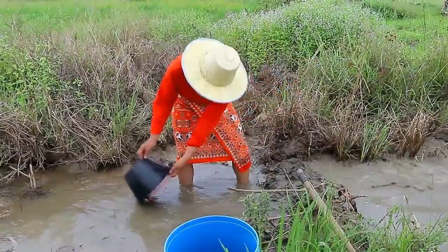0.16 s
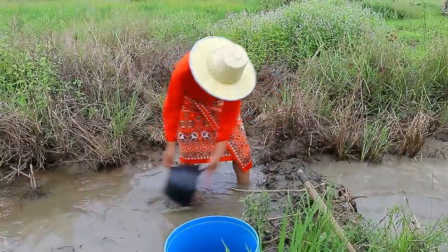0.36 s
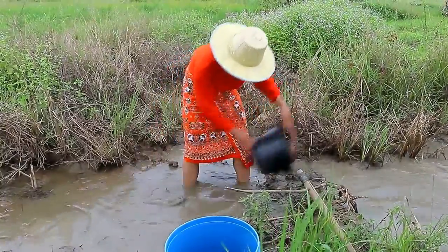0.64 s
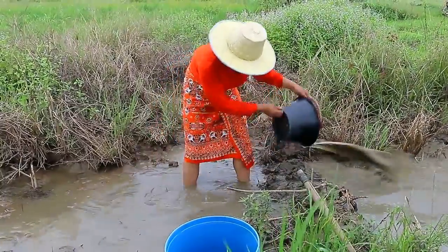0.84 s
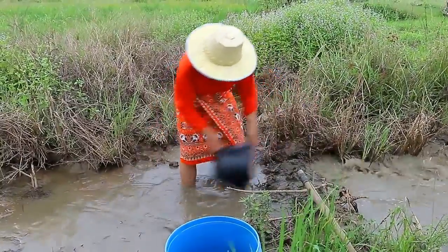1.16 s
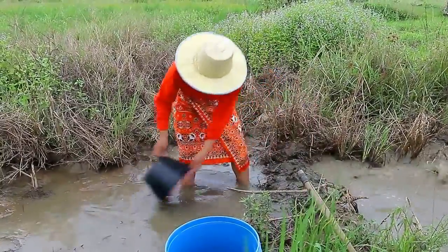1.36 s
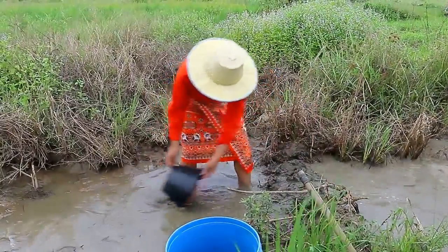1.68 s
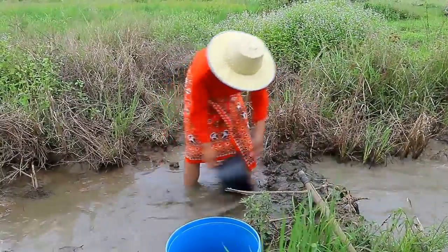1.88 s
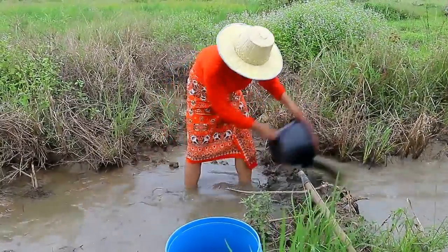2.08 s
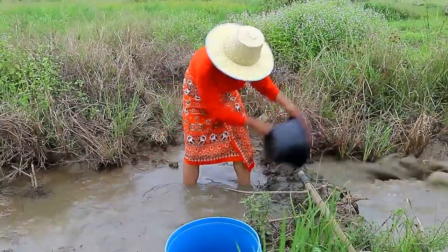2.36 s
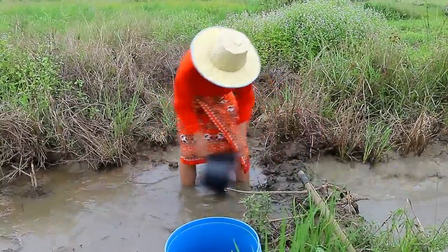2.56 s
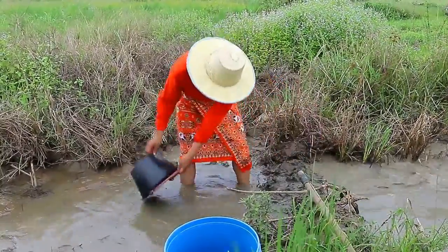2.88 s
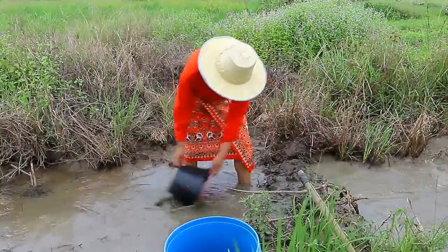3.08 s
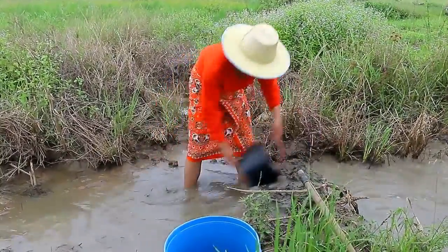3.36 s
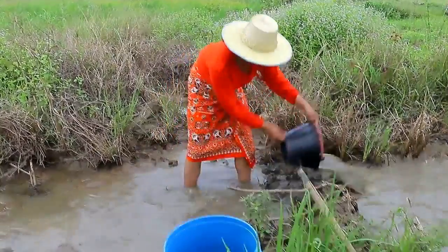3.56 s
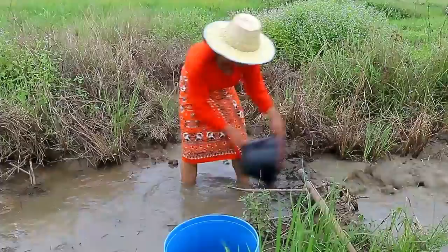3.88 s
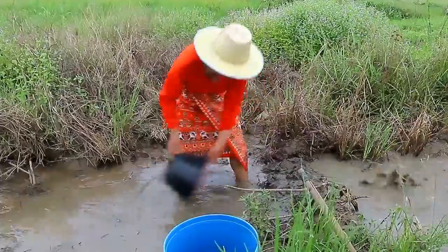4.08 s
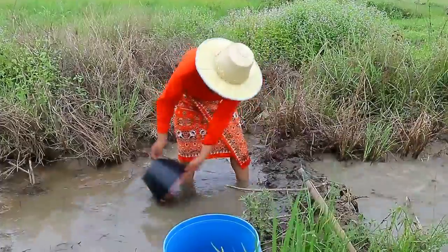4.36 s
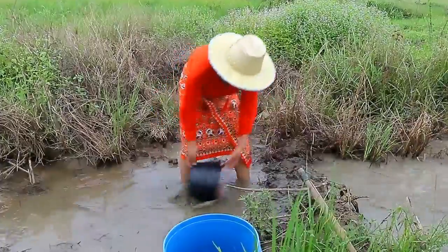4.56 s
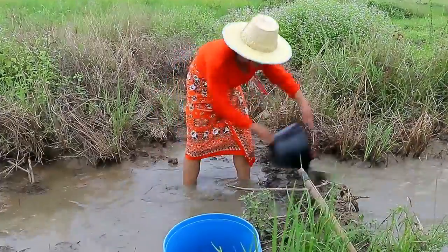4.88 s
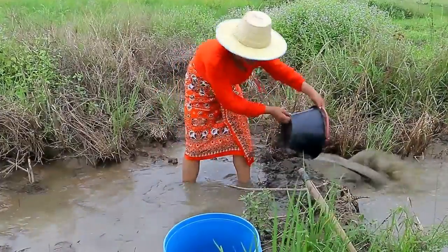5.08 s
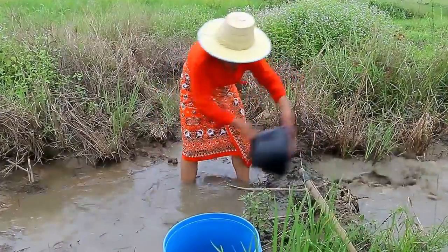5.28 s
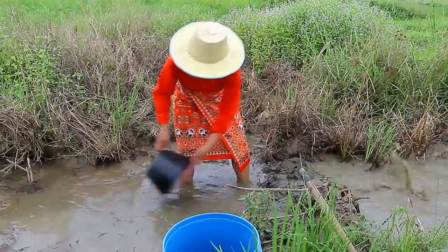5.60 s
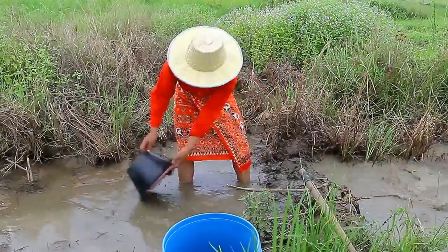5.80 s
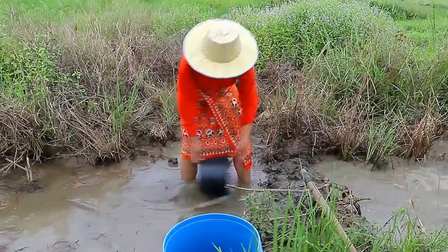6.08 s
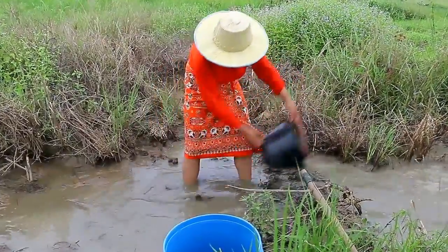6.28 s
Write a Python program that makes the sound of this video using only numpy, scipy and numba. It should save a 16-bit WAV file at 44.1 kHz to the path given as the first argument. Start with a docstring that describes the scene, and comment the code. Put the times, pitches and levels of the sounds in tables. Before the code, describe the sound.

Open field beside a ditch, stereo microphone exposed to wind. Water trickles and drips, then a bucketful slaps down in a wet, spattering splash; this repeats four times at a steady working pace. Deep air-pocket gurgles sit under the splashes, and one dull bucket knock precedes the last. High insect chirps and rapid hissy buzzes stay faint behind, over steady soft rustle. Wind thumps separately left and right, and a new scoop's spill begins as it ends.

```python
"""Bailing a ditch by bucket

A bucket scoops muddy water and throws it over a bank, where it lands in long splashes: swarms of damped,
rising sines in four bubble sizes plus noise wash. Single drops, and one knock of the bucket, are a noise
crack with a damped sine. Wind buffets each port as low noise and short eddies; one insect chirps falling
tones, another buzzes in bursts of narrow modulated hiss, and the field rustles as steady shaped noise."""
import sys
import numpy as np
from scipy.fft import rfft, irfft, next_fast_len
from scipy.io import wavfile
from scipy.ndimage import map_coordinates
from numba import njit

SR = 44100
rng = np.random.default_rng(int(sys.argv[2]) if len(sys.argv) > 2 else 0)


def unload_audio(sound):
    """Save the sound as a 16-bit wav file, at the path given as the first command line argument."""
    columns = np.transpose(np.atleast_2d(sound))
    # keep every value between -1 and 1, then stretch to whole-number steps
    steps = np.round(np.clip(columns, -1, 1) * 32767)
    wavfile.write(sys.argv[1], SR, steps.astype(np.int16))


N = 283860
LAG_S = 50e-6  # mean delay of the left port behind the right


def amp(db):
    """Amplitude factor from dB."""
    return 10 ** (np.asarray(db) / 20)


def unit(x):
    """Scale to rms 1 over all channels."""
    return x / np.sqrt(np.mean(x ** 2) + 1e-20)


def along(points, hz):
    """Interpolate (f/Hz, value) points on a log frequency axis."""
    f, v = np.transpose(points)
    return np.interp(np.log(hz + 1), np.log(f + 1), v)


def curves(rows, outside=None):
    """One value per sample for each column after the time."""
    s, *cols = np.transpose(rows)
    t = np.arange(N) / SR
    return np.array([np.interp(t, s, c, outside, outside) for c in cols])


def wobble(rate_hz):
    """Smooth random curve with rate_hz knots a second."""
    knots = rng.standard_normal(int(N * rate_hz / SR) + 4)
    return map_coordinates(knots, [np.arange(N) * rate_hz / SR])


def filtered(x, response):
    """Apply a complex response of frequency."""
    m = next_fast_len(N + SR // 2)
    hz = np.fft.rfftfreq(m, 1 / SR)
    return irfft(rfft(x, m) * response(hz), m)[..., :N]


def rush(spectrum):
    """Stereo noise of rms 1, partly alike in both ports, reaching the left one LAG_S late."""
    # Left-right likeness of diffuse sound: f/Hz, correlation
    alike = [(300, 1), (1000, 0.68), (3000, 0.65), (8000, 0.063), (15000, 0.21)]

    def mid_side(hz):
        turn = np.arccos(np.clip(along(alike, hz), -1, 1)) / 2
        return amp(along(spectrum, hz)) * [np.cos(turn), np.sin(turn)]

    def delay(hz):
        return np.exp(-1j * np.pi * hz * LAG_S * np.array([[1], [-1]]))

    mid, side = filtered(rng.standard_normal((2, N)), mid_side)
    return unit(filtered(np.array([mid + side, mid - side]), delay))


@njit
def add(out, start, hz, cycles, size, rise, soft, sr):
    """Add damped sines whose pitch climbs as the bubble nears the surface."""
    for g in range(len(start)):
        first = int(start[g] * sr) + 1
        life = cycles[g] / hz[g]
        for i in range(max(first, 0), min(first + int(5 * life * sr), len(out))):
            u = (i / sr - start[g]) / life
            tone = np.sin(2 * np.pi * cycles[g] * u * (1 + rise * u))
            out[i] += size[g] * tone * np.exp(-u) * (1 - np.exp(-u / soft))


def ring(start, hz, cycles, size, rise, scatter_s, soft=0.27):
    """Damped sines in stereo: each has its own delay and balance between the ports."""
    out = np.zeros((2, N))
    place = rng.standard_normal((len(start), 2))
    # delays scatter more at low pitch, as echoes blur the low bubbles' direction
    lag = LAG_S + scatter_s * place[:, 0] * np.sqrt(8000 / hz)
    for port, sign in enumerate((1, -1)):
        port_size = size * amp(sign * 0.25 * place[:, 1])
        add(out[port], start + sign * lag / 2, np.clip(hz, 50, 17000), cycles, port_size, rise, soft, SR)
    return out


def swarm(density, count, hz, octaves, cycles, spread_db, rise):
    """Random bubbles, rms 1; low density (0-1) makes them fewer and individually larger."""
    # Ground echo and microphone housing: f/Hz, gain/dB
    path = [(60, 10.5), (200, -8.5), (350, -3.5), (576, -8), (760, -3), (990, -0.5), (1260, -4),
            (1500, -2.5), (1850, 2), (2300, 0.5), (3300, 1), (3800, -0.5), (6600, -6), (15000, -11)]
    even = rng.random((count, 3))
    normal = rng.standard_normal((count, 2))
    share = density[(even[:, 0] * N).astype(int)]
    kept = even[:, 2] < share
    size = amp(-spread_db * np.log(1.01 - even[:, 1])) * kept / np.sqrt(share)
    pitch = hz * 2 ** (octaves * normal[:, 0])
    ring_cycles = cycles * 2 ** (0.76 * normal[:, 1])
    cloud = ring(even[:, 0] * N / SR, pitch, ring_cycles, size, rise, scatter_s=24e-6)
    return unit(filtered(cloud, lambda f: amp(along(path, f))))


def water():
    """Four bubble sizes, from trapped air pockets down to spray, all surging together."""
    # Unresolved droplets: f/Hz, relative density/dB per Hz
    wash = [(1200, -66), (1800, -6.5), (3300, -2.5), (6600, -21.5), (13800, -29.5), (15700, -46)]
    deep_gain, bubbles_gain, spatter_gain, spray_gain = water_levels()
    surge_db = 1.18 * wobble(14) + 0.9 * wobble(75)
    density = np.clip(bubbles_gain * amp(40.5), .25, 1)  # a splash is a dense wash, a lull a patter
    deep = swarm(density, count=2000, hz=356.5, octaves=0.308, cycles=1.98, spread_db=2, rise=0.026)
    bubbles = swarm(density, count=9000, hz=884.7, octaves=0.3466, cycles=3.15, spread_db=3.5, rise=0.027)
    spatter = swarm(density, count=18000, hz=2498, octaves=.6, cycles=4.2, spread_db=1.5, rise=0.011)
    spatter = unit(spatter + 0.42 * rush(wash[:4]))
    spray = swarm(density, count=36000, hz=8530, octaves=.6, cycles=5.7, spread_db=2.5, rise=0.0046)
    spray = unit(spray + 0.79 * rush([(4000, -20)] + wash[3:]))
    mix = deep_gain * deep + bubbles_gain * bubbles + spatter_gain * spatter + spray_gain * spray
    return amp(surge_db) * mix


def water_levels():
    """Gains of deep gurgle, bubbles, spatter and spray, summed over trickle, spills and throws."""
    # Landing bucketfuls, one list per throw: t/s, bubbles/dB, spatter/dB
    landings = [
        [(0.885, -52, -81), (0.897, -46, -47), (0.921, -59.5, -39.5), (0.963, -53, -33), (0.997, -27, -36.5),
         (1.009, -33, -36), (1.125, -29, -34), (1.149, -26.5, -28), (1.195, -36, -36), (1.279, -34.5, -37),
         (1.33, -52.5, -51)],
        [(2.17, -71.5, -58), (2.214, -40, -38.5), (2.338, -30.5, -33.5), (2.42, -30.5, -39.5),
         (2.488, -35.5, -30.5), (2.582, -32, -41), (2.63, -34, -35), (2.644, -28, -32), (2.67, -42, -43.5),
         (2.718, -46.5, -54), (2.74, -58.5, -65)],
        [(3.57, -55, -49), (3.606, -37, -38), (3.766, -35.5, -38.5), (3.776, -26, -39.5), (3.822, -24.5, -25),
         (3.94, -33, -41), (4.026, -34, -30.5), (4.054, -45, -38.5), (4.068, -39, -31.5), (4.092, -41, -56),
         (4.14, -53, -56)],
        [(4.92, -55, -46), (5.004, -52.5, -43), (5.034, -40.5, -34.5), (5.098, -44, -41.5), (5.116, -31, -43),
         (5.126, -40, -39), (5.176, -35, -41.5), (5.222, -29.5, -31.5), (5.354, -33, -35.5),
         (5.438, -24.5, -27.5), (5.56, -53.5, -58)],
    ]
    # Finest spray re spatter, one per throw: level/dB
    throw_spray_db = [-6, -5.5, -5.5, -7]
    # Water draining and stirred by the scoop: t/s, bubbles/dB, spatter/dB
    trickle_rows = [(0, -51.5, -53), (.12, -50.5, -52.5), (.28, -45.5, -48.5), (.5, -58, -55),
                    (.85, -50.5, -59), (1.35, -49, -47.5), (1.6, -51.5, -49.5), (1.85, -52.5, -63.5),
                    (2.1, -53, -51), (2.76, -51.5, -51), (3.05, -49.5, -53), (3.35, -55.5, -56.5),
                    (4.15, -47, -48), (4.5, -51.5, -52), (4.75, -55.5, -56.5), (5.55, -45, -49.5),
                    (5.75, -44, -43.5), (6, -52.5, -55), (6.44, -53, -56.5)]
    # Brief spills: t/s, bubbles/dB, spatter/dB
    spill_rows = [(.68, -47, -43), (3.448, -48, -46), (4.3, -46, -43.5), (4.89, -45, -60), (5.81, -44, -37),
                  (6.132, -50, -57), (6.335, -43.5, -35.5)]
    # Air pockets trapped under a mass of water: start t/s, hold/s, level/dB
    gurgle_rows = [(.33, 0.12, -51), (1.06, 0.095, -35.5), (1.22, .06, -35.5), (2.406, 0.24, -31),
                   (3.144, .08, -44.5), (3.68, .1, -40.5), (3.85, .17, -37), (5.14, 0.3, -35)]
    fine_spray_db, trickle_deep_db = -3, -6  # re spatter, re bubbles
    spill_rise_s, spill_fall_s = 0.038, .05
    gurgle_rise_s, gurgle_fall_s = .06, 0.072

    def sizes(bubbles_db, spatter_db, spray_db):
        return amp([bubbles_db, spatter_db, spatter_db + spray_db])

    trickle = sizes(*curves(trickle_rows), fine_spray_db)
    spills = sum(sizes(bubbles_db, spatter_db, fine_spray_db)[:, None] * swell(s, 0, spill_rise_s, spill_fall_s)
                 for s, bubbles_db, spatter_db in spill_rows)
    throws = sum(sizes(*curves(rows, outside=-120), spray_db)
                 for rows, spray_db in zip(landings, throw_spray_db))
    gurgle = sum(amp(db) * swell(s, hold, gurgle_rise_s, gurgle_fall_s) for s, hold, db in gurgle_rows)
    deep = gurgle + amp(trickle_deep_db) * trickle[0]
    return deep, *(trickle + spills + throws)


def swell(start_s, hold_s, rise_s, fall_s):
    """Gain 1 during the hold, 20 dB down at rise_s before it and at fall_s after it."""
    t = np.arange(N) / SR - start_s
    return amp(-20 * (np.maximum(-t, 0) / rise_s + np.maximum(t - hold_s, 0) / fall_s))


def drops():
    """Drops crack and ring, each a noise burst with one damped sine; one row is a knock of the bucket."""
    # Drops; the row at 4.873 s is a knock of the bucket:
    # t/s, relative level/dB, ring f/Hz, crack re ring/dB before the common trims
    drop_rows = [(0.171, -32, 1000, -1), (0.261, -28, 1120, -38), (0.319, -19.5, 966, -36),
                 (0.489, -30.5, 1150, -6.5), (0.516, -27, 990, -13), (0.685, -18.5, 1623, -10),
                 (0.779, -36, 725, -24), (0.837, -26, 970, -6), (0.897, -42, 1000, -8),
                 (0.995, -12, 848, -26), (1.134, -15, 734, -30), (1.149, -14, 1800, -25),
                 (1.169, -22, 770, -2), (1.349, -41, 7000, 1), (1.558, -31, 2100, -6),
                 (1.605, -22.5, 954, -33), (2.032, -34.5, 1450, -1), (2.048, -22, 2380, -12),
                 (2.149, -27, 2780, -24), (2.194, -25.5, 3100, -21), (2.353, -13, 660, -34),
                 (2.483, -27.5, 850, 4.5), (2.641, -14.5, 731, -36), (3.033, -23, 946, -13),
                 (3.23, -29, 2300, -20), (3.368, -29.5, 3420, -13), (3.415, -26, 3040, -16),
                 (3.441, -23, 2250, -1.5), (3.583, -28, 2270, -3), (3.772, -10.5, 760, -33),
                 (4.067, -24.5, 1010, -19), (4.305, -19, 897, -15), (4.374, -20.5, 2010, -9),
                 (4.454, -36, 980, 2.5), (4.473, -25, 1020, -29), (4.566, -40, 5030, 2),
                 (4.649, -27.5, 1096, -5.5), (4.75, -31, 2930, -23), (4.776, -32.5, 1230, -25),
                 (4.815, -23.5, 4160, -11), (4.858, -32.5, 2380, -1.5), (4.873, -19, 746, -2.5),
                 (4.918, -35, 6000, 3.5), (5.008, -20.5, 1990, -20), (5.113, -13, 914, -26),
                 (5.129, -15, 3010, -20), (5.439, -10.5, 960, -22), (5.47, -15.5, 727, -30),
                 (5.585, -34.5, 2040, 1.5), (5.799, -32, 1980, -1), (5.822, -28.5, 930, -6),
                 (5.946, -32.5, 3500, -2.5), (6.117, -31, 3020, -8), (6.133, -24, 1990, -7.5),
                 (6.245, -34, 550, -22), (6.334, -14.5, 1770, -20)]
    crack_split_hz = 1840  # events that ring lower slap dull, higher ones tick bright
    s, db, hz, crack_db = np.transpose(drop_rows)
    rings = ring(s, hz, 2.8 + hz * 0.0016, amp(db + 2.5), 0.014, scatter_s=8e-6, soft=0.75)
    t = np.arange(SR // 10) / SR
    crack = 2.56 * amp(-60 * t / .015)
    fizz = 1.11 * amp(-60 * t / 0.1)
    shape = (crack + fizz) * (1 - np.exp(-t / 0.00083))
    bright = 1 / (1 + (crack_split_hz / hz) ** 2)
    burst = np.zeros((2, N + SR))  # envelopes of slap and tick
    for at, gain, share in zip(s, amp(db + crack_db), bright):
        burst[:, round(at * SR):][:, :len(t)] += gain * np.sqrt([[1 - share], [share]]) * shape
    slap = rush([(120, -25), (300, 13), (900, -2), (2500, 0.5), (6000, -33), (15000, -33)])
    tick = rush([(500, -36), (1500, -1.5), (3500, 1.5), (6000, -1.5), (15000, -23)])
    return rings + amp(-9) * (burst[0, :N] * slap + burst[1, :N] * tick)


def wind():
    """Turbulence on each port alone: lumpy rumble, brighter in gusts, and eddies of a swing or two."""
    # Wind on the left and right ports: t/s, level/dB
    left_rows = [(0, -36.5), (.55, -37), (.8, -33), (1.2, -50), (1.5, -39), (1.75, -29.5), (2.3, -33.5),
                 (2.9, -30.5), (3.05, -35), (3.2, -28.5), (3.5, -36.5), (3.72, -45), (3.9, -24.5),
                 (4.2, -48), (4.35, -23), (4.45, -47), (4.6, -21.5), (4.75, -49), (5.3, -57), (5.65, -34.5),
                 (5.8, -38), (6.1, -24), (6.44, -41.5)]
    right_rows = [(0, -28.5), (.35, -38), (.52, -28), (.75, -43.5), (.93, -36), (1.08, -26), (1.24, -39),
                  (1.38, -27), (1.65, -29.5), (2.25, -32.5), (2.85, -43.5), (3.1, -45), (3.35, -30.5),
                  (3.9, -31.5), (4.05, -33.5), (4.24, -39.5), (4.3, -26.5), (4.4, -20.5), (4.46, -34.5),
                  (4.62, -31.5), (4.9, -44), (5.2, -54), (5.7, -39.5), (5.92, -43), (5.99, -22),
                  (6.06, -32.5), (6.16, -18), (6.28, -27), (6.4, -17)]
    # Body and upper edge of the buffeting: f/Hz, relative density/dB per Hz
    rumble_spectrum = [(15, -45), (25, -4.5), (75, 4), (118, 1.5), (152, 0), (211, -6.5), (339, -22.5),
                       (379, -19.5), (500, -31.5), (650, -33), (1100, -120)]
    flutter_spectrum = [(120, -41), (220, 2), (330, -1), (450, -4), (600, -23.5), (1100, -120)]
    # Eddies bursting on one port: t/s, relative level/dB, f/Hz, port (0 left, 1 right)
    puff_rows = [(0.085, -23.5, 150, 0), (0.695, -21, 190, 0), (1.05, -25, 87, 1), (1.576, -22, 98.5, 1),
                 (1.694, -22, 110, 1), (1.735, -20.5, 176, 0), (1.957, -24, 147, 0), (2.622, -23, 123, 0),
                 (2.75, -24.5, 116, 0), (3.138, -24, 171, 0), (3.336, -22, 98, 1), (3.408, -20, 152, 0),
                 (3.601, -13, 204, 0), (3.615, -15.5, 141, 1), (4.336, -15.5, 141, 1), (4.376, -17, 222, 1),
                 (4.387, -17, 99, 1), (4.589, -27.5, 119, 0), (5.626, -24, 146, 0), (5.942, -16.5, 242, 0),
                 (5.961, -22, 89, 1), (5.991, -15, 163, 0), (6.006, -21, 100, 1), (6.154, -9, 131, 1),
                 (6.195, -17, 195, 0), (6.208, -15.5, 152, 1), (6.239, -16.5, 144, 0),
                 (6.245, -14.5, 88, 1), (6.298, -18, 206, 1), (6.375, -12, 107, 1), (6.386, -15.5, 168, 0)]
    flutter_db, flutter_growth = -18.5, 0.71  # re rumble at -26 dB wind; dB gained per dB of wind

    strength_db = np.vstack([curves(left_rows), curves(right_rows)])
    fast_lumps = np.array([wobble(28), wobble(28)])
    slow_lumps = np.array([wobble(7.3), wobble(9)])
    lumps = unit(amp(3.1 * fast_lumps + 1.2 * slow_lumps))
    rumble, flutter = (unit(filtered(rng.standard_normal((2, N)), lambda hz: amp(along(spectrum, hz))))
                       for spectrum in (rumble_spectrum, flutter_spectrum))
    flutter_gain = amp(flutter_db + flutter_growth * (strength_db + 26))
    out = amp(strength_db) * lumps * (rumble + flutter_gain * flutter)
    t = np.arange(-SR // 30, SR // 30) / SR
    for (s, db, hz, port), turn in zip(puff_rows, rng.random(len(puff_rows))):
        eddy = amp(db + 6.5) * np.exp(-(t * hz / 0.52) ** 2) * np.cos(2 * np.pi * (hz * t + turn))
        at = round(s * SR) - SR // 30
        out[round(port), at:at + len(t)] += eddy
    return out


def chirper():
    """Clean notes that fall by about a sixth of their pitch; quick soft notes lead into full ones."""
    # Phrases: first full note t/s, period/s, relative level/dB, quick notes, full notes
    phrases = [(.69, .067, -48.5, 4, 4), (1.82, .0657, -48, 4, 4), (2.979, .066, -50, 1, 4),
               (4.098, .0653, -48, 0, 4), (5.25, .0663, -48, 0, 4), (6.021, .062, -58, 0, 3)]
    quick_s, pause_s = .041, .052  # spacing of quick notes, gap to the first full note
    quick_db, first_db = -9, -3.5  # last quick note and first full note, re full
    lead_step_db = 0.5  # level change per quick note going back, so the notes soften slightly
    out = np.zeros(N)
    t = np.arange(int(.04 * SR)) / SR
    pitch_hz = np.linspace(7000, 5950, len(t))
    note = np.hanning(len(t)) ** 0.48 * np.sin(2 * np.pi * np.cumsum(pitch_hz) / SR)
    for s, period, db, quick, full in phrases:
        notes = [(s - pause_s - quick_s * k, db + quick_db + lead_step_db * k) for k in range(round(quick))]
        notes += [(s + period * k, db + first_db * (k == 0)) for k in range(round(full))]
        for at, level_db in notes:
            out[round(at * SR):][:len(t)] += amp(level_db) * note
    out = out + 0.31 * np.roll(out, round(0.016 * SR))  # the bank answers
    return out * amp([[2.5], [-2.5]])


def buzzer():
    """Wing strokes modulate a narrow hiss; every burst swells and stops short."""
    # Phrases: end of first burst t/s, bursts, period/s, level at burst end/dB
    phrases = [(.08, 4, .113, -55), (1.9, 2, .11, -64), (2.98, 5, .11, -63), (4.165, 8, .108, -55.5),
               (5.005, 4, .108, -57), (5.545, 9, .1072, -53.5)]
    t = np.arange(N) / SR
    level = np.zeros(N)
    for end, bursts, period, db in phrases:
        for k in range(int(bursts)):
            before = end + k * period - t
            level += amp(db - 60 * np.abs(before)) * (before > 0) * (before < .075)
    strokes = np.cos(2 * np.pi * 133 * t) + 2.3
    hiss = rush([(8600, -40), (9100, -7), (9650, 0), (10050, -4), (10500, -40)])
    return level * unit(strokes * hiss)


def field():
    """Steady broadband rustle whose level drifts slightly."""
    # Rustle: f/Hz, relative density/dB per Hz
    rustle = [(120, 2.5), (200, -9), (545, -11.5), (978, -12), (1190, -12), (5630, -15.5), (6520, -13.5),
              (9730, -17.5), (13500, -24), (15600, -36)]
    return amp(-52.5 + 0.73 * wobble(3.08)) * rush(rustle)


def scene():
    """Water, wind and insects over the rustle of the field."""
    return water() + drops() + wind() + chirper() + buzzer() + field()


def record(dry):
    """Microphone chain: left port duller than the right, deepest bass cut, nothing above the band limit."""
    # Left port re right: f/Hz, gain/dB
    ports = [(300, -0.5), (1300, -1), (2400, -2.5), (4400, -1), (15000, -2.5)]
    top_hz, bass_hz = 15800, 38  # band limit, -6 dB point of the bass cut

    def response(hz):
        bass_cut = hz ** 2 / (hz ** 2 + bass_hz ** 2)
        balance = amp(along(ports, hz) * np.array([[.5], [-.5]]))
        return (hz < top_hz) * bass_cut * balance

    return filtered(dry, response)


dry = scene()
out = record(dry)
unload_audio(out)
```